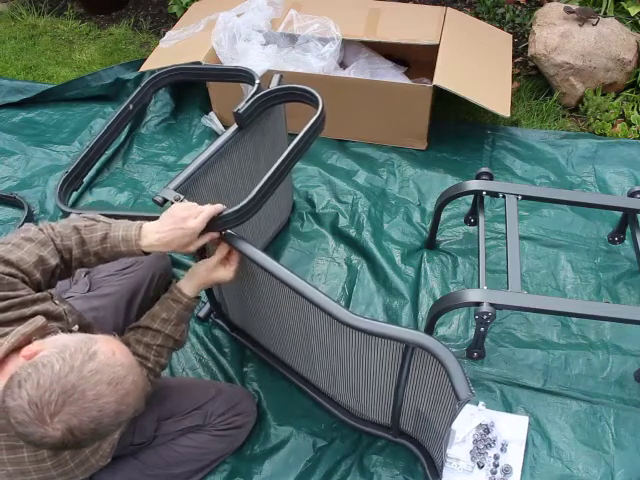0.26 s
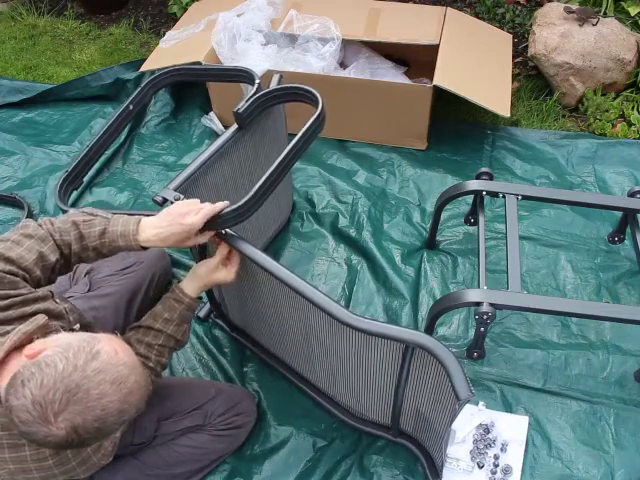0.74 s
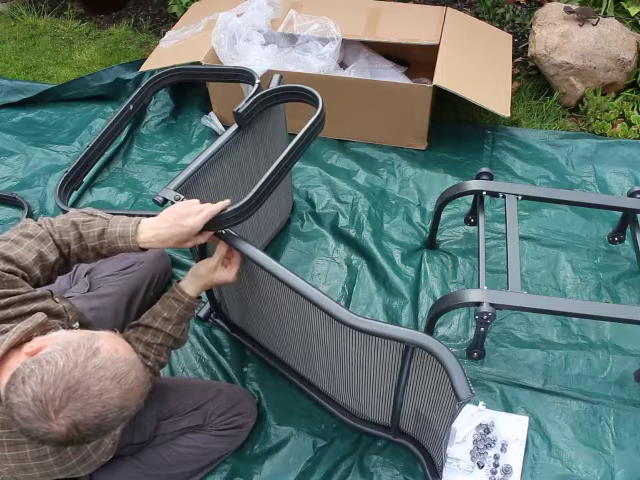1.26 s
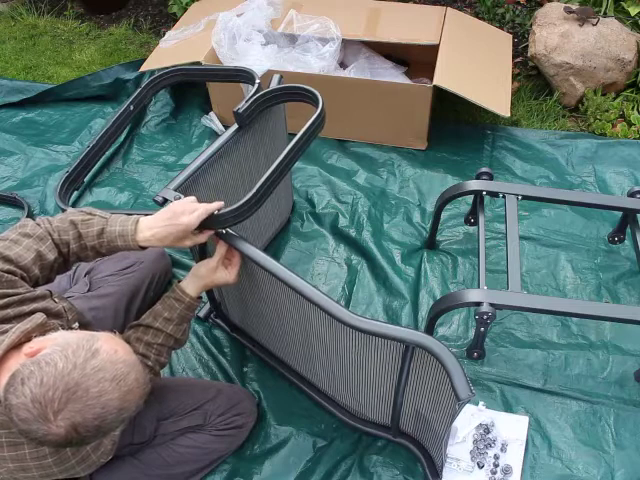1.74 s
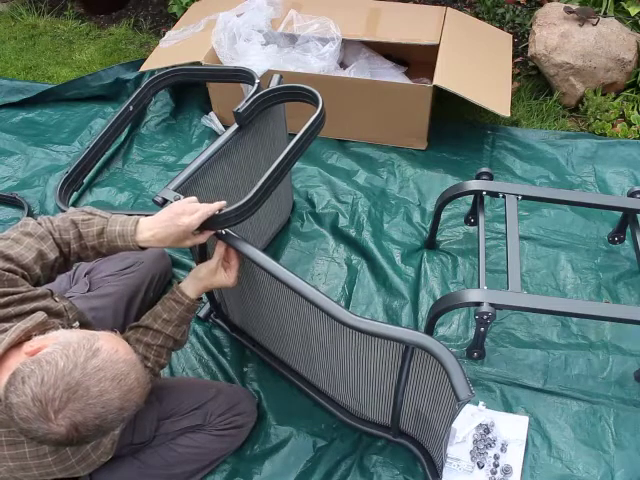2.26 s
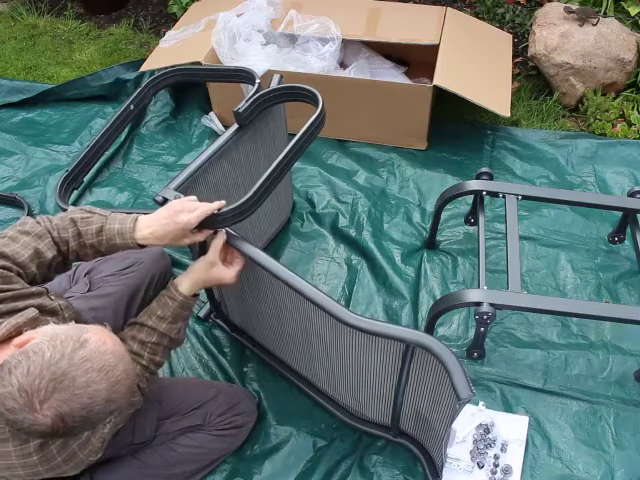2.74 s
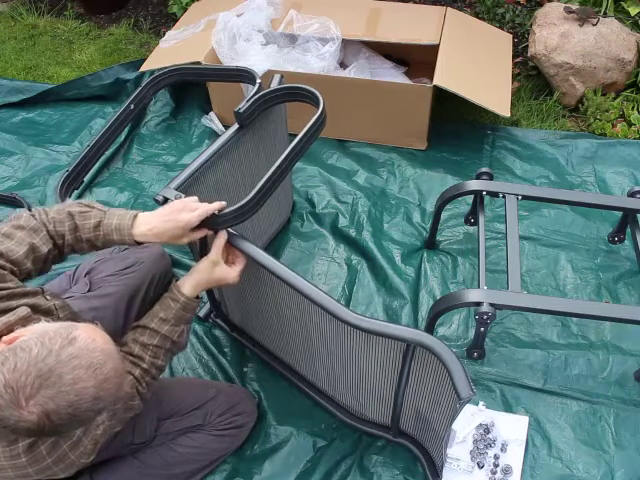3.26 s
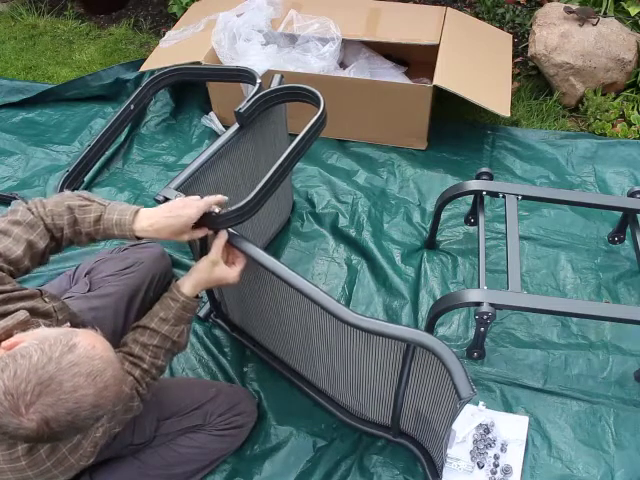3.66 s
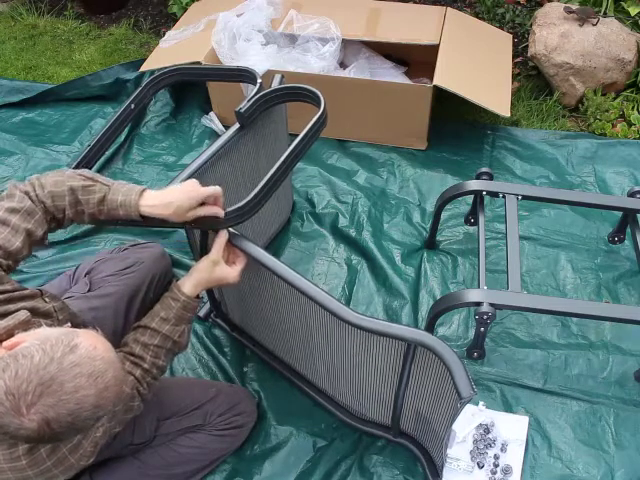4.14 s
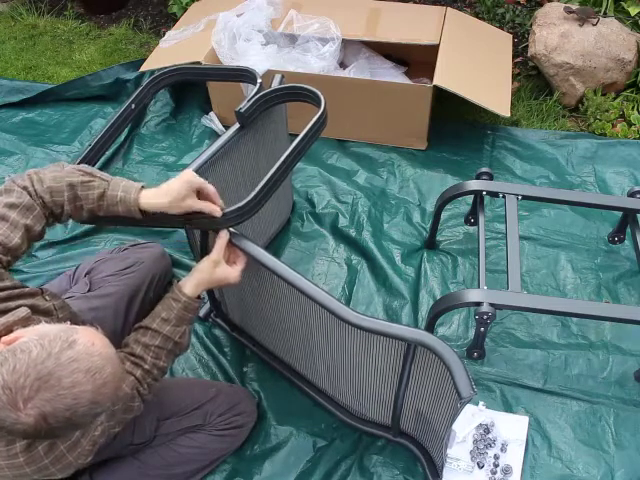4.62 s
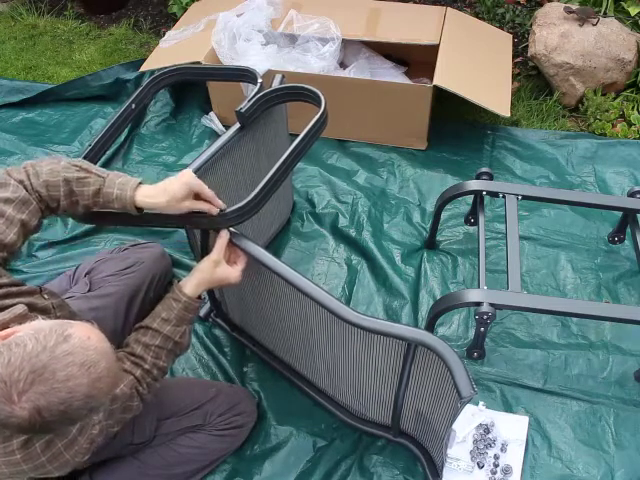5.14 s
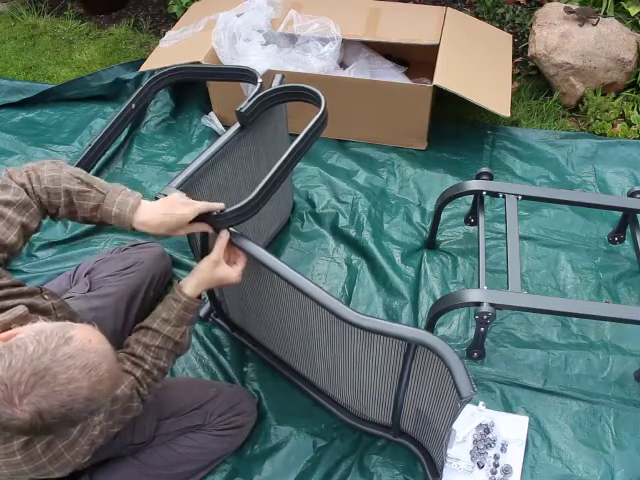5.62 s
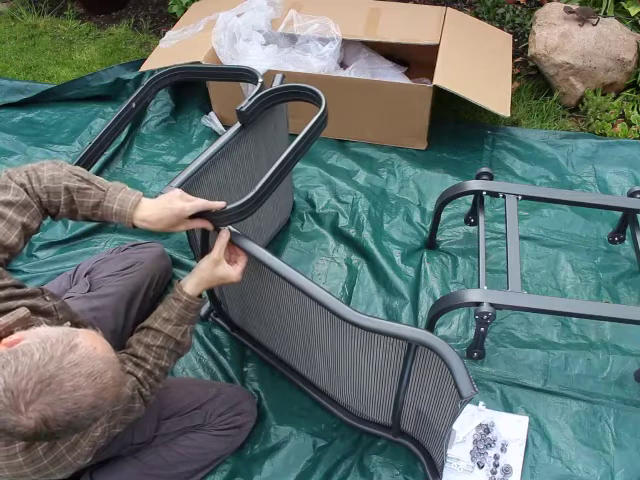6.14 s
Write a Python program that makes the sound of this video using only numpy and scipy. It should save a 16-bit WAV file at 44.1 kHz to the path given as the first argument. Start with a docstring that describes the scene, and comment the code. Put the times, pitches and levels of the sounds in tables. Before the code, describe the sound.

Small metal taps and clicks start first, close and crisp, with short scrapes from a thin-walled chair frame. A hoarse low growl leads into a pigeon's round hooting coos, seven notes with short gaps, rising and sagging in pitch. Behind them are faint bird whistles, clearest near the end, a distant second pigeon, light leaf rustle and soft air hiss. Open garden, close microphone, only slight short echoes.

```python
"""In a garden a wood pigeon coos close by, a second one answers far off and a songbird whistles.
Near the microphone, fingers turn a bolt in a tubular metal chair frame: taps, clicks and rubbing.
Voices are gliding sines mixed with band-limited noise; the chair is noise bursts exciting tube modes.
Leaves are grains of coloured noise, the air is shaped hiss, and far traffic is a drone and a roll."""
import sys
import numpy as np
from scipy import signal
from scipy.fft import rfft, irfft
from scipy.io import wavfile
from scipy.ndimage import uniform_filter1d

SR = 44100
rng = np.random.default_rng(int(sys.argv[2]) if len(sys.argv) > 2 else 0)


def pcm_store(signal):
    """Save signal as 16-bit PCM."""
    levels = np.round(np.clip(np.atleast_2d(signal), -1, 1) * 32767)
    wavfile.write(sys.argv[1], SR, levels.astype(np.int16).T)


N = 281799


def amp(db):
    """Level definition: decibels to an amplitude ratio."""
    return 10 ** (np.asarray(db) / 20)


def evened(x):
    """Normalisation: scales a signal to unit rms."""
    return x / np.sqrt(np.mean(x ** 2) + 1e-20)


def smooth(x, size):
    """Low-pass averaging: two passes of a moving mean over size samples."""
    return uniform_filter1d(uniform_filter1d(x, size), size)


def read(points, hz):
    """Interpolation of a spectrum curve on a logarithmic frequency axis."""
    f, value = np.transpose(points)
    return np.interp(np.log(hz + 1), np.log(f + 1), value)


def add(mix, s, sound):
    """Superposition: adds a sound into the mix from s seconds on."""
    part = mix[max(round(s * SR), 0):][:len(sound)]
    part += sound[:len(part)]


def follow(rows):
    """Linear interpolation: start time and the columns of a table at sample rate."""
    s, *columns = np.transpose(rows)
    t = np.arange(s[0], s[-1], 1 / SR)
    return s[0], [np.interp(t, s, c) for c in columns]


def resonate(x, hz, width):
    """Heterodyne resonator: shifts the curve hz down to zero, smooths, and shifts back."""
    turn = np.exp(2j * np.pi * np.cumsum(hz * np.ones(len(x))) / SR)
    r = np.exp(-np.pi * np.mean(width) / SR)
    return 2 * (turn * signal.lfilter([1 - r], [1, -r], x / turn)).real


def narrow_band(x, hz, width):
    """Cascaded resonance: two equal resonators in series give steeper skirts."""
    return resonate(resonate(x, hz, width), hz, width)


def coloured(x, gain):
    """Linear filtering: applies gain(hz) to the whole spectrum."""
    return irfft(rfft(x) * gain(np.fft.rfftfreq(len(x), 1 / SR)), len(x))


# Spectrum of the air hiss. Each row: frequency in Hz, relative density in dB per Hz.
AIR_SPECTRUM = [(15, -78), (25, -29), (252, -0.5), (496, 0), (568, -2), (651, -4), (952, -4), (1830, -17),
                (2040, -13.5), (2900, -66), (4990, -35), (6920, -23), (14800, -22), (16500, -35)]
AIR_DB = -42.5  # hiss rms
# Far traffic. Each row: time in seconds, drone level in dB, roll level in dB.
TRAFFIC_LEVELS = [(0.0, -54, -75), (0.36, -64, -62), (0.53, -73, -48), (0.76, -54, -68), (1.14, -60, -64),
                  (1.47, -74, -69), (1.69, -61, -69), (2.63, -79, -65), (2.69, -69, -59.5),
                  (3.92, -73, -59.5), (4.0, -62, -72), (4.29, -70, -62), (4.77, -66, -67),
                  (4.84, -75, -69.5), (6.07, -63, -57), (6.39, -80, -66)]


def air():
    """Broadband noise: hiss with drifting spectral patches, over a low tonal drone and a noisy roll."""
    frames, hz = N // 256 + 5, np.fft.rfftfreq(1024, 1 / SR)
    real, imaginary, patches = rng.standard_normal((frames, 513, 3)).T
    patches_db = evened(uniform_filter1d(uniform_filter1d(patches, 12, 0), 14, 1))
    spectrum = (real + 1j * imaginary) * amp(read(AIR_SPECTRUM, hz)[:, None] + patches_db)
    hiss = signal.istft(spectrum, nperseg=1024, noverlap=768)[1][:N]
    out = amp(AIR_DB) * evened(hiss)

    s, (drone_db, roll_db) = follow(TRAFFIC_LEVELS)
    noise = rng.standard_normal(len(drone_db))
    drone_hz = 70 + 1.5 * evened(smooth(noise, size=8000))
    drone = np.sqrt(2) * np.sin(2 * np.pi * np.cumsum(drone_hz) / SR)
    roll = evened(narrow_band(noise, 97, 45))
    add(out, s, amp(drone_db) * drone + amp(roll_db) * roll)
    return out


# Wind in the leaves. Each row: time in seconds, level in dB.
RUSTLE_LEVELS = [(0.0, -46), (1.17, -47), (1.26, -49.5), (2.12, -48), (2.47, -45), (3.35, -45.5),
                 (3.61, -43.5), (4.79, -45.5), (5.09, -45.5), (5.61, -45.5), (5.82, -46), (6.39, -44.5)]
# Spectrum of the leaves. Each row: frequency in Hz, relative density in dB per Hz.
LEAF_SPECTRUM = [(700, -18), (1500, 0.5), (2200, -0.5), (3200, -0.5), (4500, 0), (5800, -1.5), (6800, -8.5),
                 (9000, -12), (13000, -21)]


def rustle():
    """Granular friction noise: dense small grains of leaf contact that swell with the breeze."""
    s, (db,) = follow(RUSTLE_LEVELS)
    strength_db = 0.71 * np.minimum(rng.exponential(1, N // 100 + 1), 4)
    grains = rng.standard_normal(len(db)) * amp(strength_db).repeat(100)[:len(db)]
    out = np.zeros(N)
    add(out, s, amp(db) * evened(coloured(grains, lambda hz: amp(read(LEAF_SPECTRUM, hz)))))
    return out


RISE_SHARE, FALL_SHARE = .3, 2.5  # glide constants in call lengths: rises leap early, falls slide evenly
SWELL_SHARE, FADE_DB = .3, -4  # tapered share of a call (half at each end), level change over a call


def whistle(length, first_hz, last_hz, db, width, hoarse):
    """Tone and noise mixed by power: a gliding sine with a narrow noise band on the same pitch."""
    u = np.arange(0, length, 1 / SR) / length
    share = RISE_SHARE if last_hz > first_hz else FALL_SHARE
    hz = first_hz + (last_hz - first_hz) * (1 - np.exp(-u / share)) / (1 - np.exp(-1 / share))
    fuzz = evened(narrow_band(rng.standard_normal(len(u)), hz, width))
    pure = np.sqrt(2) * np.sin(2 * np.pi * np.cumsum(hz) / SR)
    shape = amp(db + FADE_DB * u) * signal.windows.tukey(len(u), SWELL_SHARE)
    return shape * (np.sqrt(1 - hoarse) * pure + np.sqrt(hoarse) * fuzz)


# Songbird notes. Each row: start in seconds, length in seconds, first pitch in Hz, last pitch in Hz,
# level in dB before swell and fade, noise spread in Hz.
SONG_NOTES = [(0, 0.045, 2110, 2060, -46.5, 100), (0, 0.087, 3550, 3350, -40, 500),
              (.68, 0.14, 2400, 2110, -43.5, 150), (.8, .14, 2230, 2180, -47, 250),
              (0.887, 0.19, 4400, 4470, -48, 600), (0.956, 0.17, 2500, 2600, -43, 300),
              (1.145, 0.047, 4150, 3750, -42, 250), (1.187, 0.1, 3680, 3560, -42, 250),
              (1.156, 0.21, 2100, 2250, -46.5, 200), (1.201, 0.093, 3300, 2800, -46.5, 400),
              (1.805, 0.097, 1760, 1780, -46, 80), (2.04, .13, 1995, 2020, -41, 90),
              (2.289, 0.25, 2770, 2400, -41.5, 320), (2.622, .19, 7300, 7400, -48, 500),
              (3.137, .13, 3150, 3165, -51.5, 40), (3.779, 0.079, 4300, 4450, -48, 199.6),
              (3.592, .07, 5470, 5390, -54, 79.63), (3.869, .07, 4240, 4710, -53, 200),
              (3.9, .11, 4860, 4900, -51, 120.5), (4.02, 0.077, 3400, 3600, -58, 250),
              (4.179, 0.091, 2250, 2040, -52, 35.2), (4.229, 0.042, 3500, 2550, -47, 39.93),
              (4.643, 0.13, 2250, 2900, -47, 40), (4.65, 0.046, 2060, 2190, -41, 60),
              (4.73, 0.088, 1800, 2240, -37.5, 60), (4.845, 0.061, 3150, 2440, -38, 39.92),
              (5.103, 0.097, 1690, 1675, -39, 50), (5.251, 0.062, 1730, 2100, -33, 250),
              (5.343, 0.067, 2285, 2270, -27.5, 60), (5.413, 0.14, 2230, 2179, -29, 40),
              (5.53, 0.094, 2190, 2151, -41, 60)]
# Coos of the far pigeon. Each row: start in seconds, length in seconds, first pitch in Hz,
# last pitch in Hz, level in dB before swell and fade.
FAR_COO_NOTES = [(1.5, 0.11, 512, 516, -34), (2.1, 0.214, 440, 505, -39.5), (3.03, .17, 458, 462, -38.5),
                 (3.7, 0.22, 516.6, 504.6, -45), (5.19, 0.13, 500.5, 483, -41), (5.95, 0.13, 500, 499, -37),
                 (6.11, 0.32, 440, 548, -43.5)]
HOARSE_AT_HZ = 90  # spread at which a songbird's whistle is half noise by power


def far_birds():
    """Frequency-modulated whistling: distant song and coos; the wider a song note, the hoarser."""
    out = np.zeros(N)
    for s, *call in FAR_COO_NOTES:
        add(out, s, whistle(*call, width=32, hoarse=0.17))
    for s, *call in SONG_NOTES:
        spread_hz = call[-1]
        add(out, s, whistle(*call, hoarse=1 / (1 + (HOARSE_AT_HZ / spread_hz) ** 2)))
    return out


# Modes of the tubular frame. Each row: frequency in Hz, bandwidth in Hz, gain in dB.
TUBE_MODES = [(867, 25, -5), (1172, 6.2, -4.5), (1236, 25, 6), (1480, 47, 7.5), (1690, 15, 2),
              (1952, 22.4, 8.5), (2157, 61, 5.5), (2363, 59, 1.5), (2666, 57, -1.5), (2840, 21, -15.5),
              (3110, 43, -0.5), (3370, 25, 4), (3570, 16, -5), (3700, 110, -5), (4000, 30, -7.5),
              (4560, 25, -20.5), (4624, 25, -7), (4953, 75, 3.5), (5430, 17, -9.5), (5870, 49, -5.5),
              (5750, 45, -12), (6200, 53, -4), (7400, 50, -10), (8130, 88, -0.5)]


def frame(force, weights_db):
    """Modal superposition: the tube modes ring under a force."""
    out = 0
    for (f, width, db), weight_db in zip(TUBE_MODES, weights_db):
        out = out + amp(db + weight_db) * resonate(force, f, width) / np.sqrt(width)
    return out


def thin_walls(hz):
    """Radiation efficiency: thin tube walls radiate little bass and little top treble."""
    return 1 / (1 + (600 / (hz + 1)) ** 4) / (1 + (hz / 12000) ** 6)


# Short slides of bolt and fingers. Each row: start in seconds, length in seconds, level in dB,
# colour centre in Hz, breadth in octaves (6 dB down), ring share from 0 to 1.
SLIDES = [(0.201, 0.15, -51.5, 4900, 1.3, 0.65), (0.411, 0.1, -49.5, 3350, 3.6, 0.8),
          (0.552, 0.13, -44, 2560, 0.97, 0.7), (1.477, 0.33, -40, 2720, 1.2, 0.96),
          (2.573, 0.18, -43.5, 4000, 0.53, 1), (3.114, 0.089, -67, 9970, 0.42, 0.2),
          (3.414, 0.13, -47.5, 4300, 0.41, 0.9), (3.862, 0.24, -51, 3770, 0.65, 0.28),
          (4.459, 0.14, -50.5, 2840, 1.7, 0.72), (4.937, 0.1, -49, 2910, 1.26, 1),
          (5.309, 0.077, -45, 2678, 1.08, 0.99), (5.706, .2, -43, 2596, 0.92, 0.6),
          (5.941, 0.13, -52.5, 3500, 0.68, 0.49)]


def scrapes():
    """Stick-slip friction as clumped grains: they swell quickly and die away, partly ringing the tubes."""
    out = np.zeros(N)
    for s, length, db, colour_hz, breadth, ring in SLIDES:
        u = np.arange(16384) / SR / length
        clumps = amp(5.4 * np.minimum(rng.exponential(1, 128), 3)).repeat(128)
        swell = np.sin(np.pi * np.minimum(u, 1) ** 0.38)
        grains = rng.standard_normal(len(u)) * clumps * swell

        def colour(hz):
            octaves = np.log2((hz + 1) / colour_hz)
            return amp(np.maximum(-6 * (octaves / breadth) ** 2, -60))

        grains = coloured(grains, colour)
        rung = frame(grains, np.zeros(len(TUBE_MODES)))
        slide = (1 - ring) * evened(grains) + ring * evened(rung)
        # the root refers the level to the slide's length, not to the whole buffer
        add(out, s, amp(db) * evened(coloured(slide, thin_walls)) * np.sqrt(u[-1]))
    return out


# Taps of bolt and fingers. Each row: time in seconds, nominal peak in dB (three times the early rms),
# ringing region in Hz, hardness in dB per octave, chatter t60 in seconds, ring share from 0 to 1.
TAP_EVENTS = [(0.208, -31, 1490, -9, 0.1, 0.5), (0.2305, -29, 3350, -4, 0.099, 0.3),
              (0.4245, -22.5, 1480, 14, 0.098, 0.75), (0.4435, -21, 1940, 5, 0.079, 0.55),
              (0.5586, -28, 1970, -5, 0.065, 0.7), (0.5723, -18, 1940, -6, 0.071, 0.46),
              (0.623, -8, 1940, 5.5, 0.096, 0.33), (0.6614, -16.5, 5050, -4, 0.034, 0.62),
              (1.0049, -8.5, 3770, 1.5, 0.047, 0.54), (1.5105, -13.5, 3400, 1, 0.089, 0.73),
              (1.5496, -8, 1966, 0, 0.17, 0.62), (1.5994, -14.5, 1963, 1.5, 0.2, 0.5),
              (1.6324, -16.5, 1950, 4, 0.16, 0.65), (1.6716, -10.5, 5070, 4, 0.081, 0.58),
              (1.7076, -17, 1973, -12, 0.087, 0.63), (1.722, -12, 1980, -6, 0.071, 0.75),
              (2.173, -5.5, 1952, -0.5, 0.057, 0.61), (2.513, -15.5, 4720, 9, 0.062, 0.51),
              (2.5275, -28.5, 1940, -10, 0.08, 0.63), (2.574, -2.5, 5100, 5, 0.06, 0.49),
              (2.6263, -21, 1458, -5, 0.063, 0.55), (2.6875, -23, 1946, -15, 0.069, 0.58),
              (2.9185, -18.5, 1920, 2, 0.065, 0.58), (3.1072, -21.5, 1237, -6, 0.11, 0.42),
              (3.1437, -24.5, 2000, 13, 0.08, 0.72), (3.4079, -3.5, 1950, 4.5, 0.057, 0.4),
              (3.5244, -26, 1314, 0, 0.068, 0.6), (3.535, -18.5, 1955, -8, 0.072, 0.66),
              (3.6461, -12.5, 2400, 7, 0.065, 0.82), (3.6647, -16.5, 2405, -1, 0.065, 0.58),
              (3.8551, -11.5, 1220, 0, 0.057, 0.74), (3.8651, -23.5, 1970, 5, 0.062, 0.89),
              (3.9889, -15.5, 1240, -2, 0.071, 0.6), (4.2666, -8, 3420, 2, 0.06, 0.52),
              (4.3713, -26.5, 1220, 1.5, 0.054, 0.63), (4.4401, -18.5, 1200, -7, 0.065, 0.58),
              (4.4572, -8, 3080, 1, 0.065, 0.41), (4.4877, -12, 3110, -1, 0.065, 0.4),
              (4.7067, -20.5, 1207, -6.5, 0.062, 0.57), (4.8381, -19.5, 3410, -9, 0.052, 0.7),
              (4.9158, -25, 2650, -12, 0.073, 0.62), (4.9413, -12.5, 3126, -1, 0.065, 0.73),
              (4.9593, -6.5, 3120, 1, 0.058, 0.65), (4.9785, -6.5, 3110, 2, 0.069, 0.54),
              (5.0502, -26, 1710, -6, 0.065, 0.56), (5.0636, -14, 1470, -5, 0.067, 0.67),
              (5.0789, -26, 3420, 1.5, 0.061, 0.6), (5.229, -6.5, 3430, -3.5, 0.057, 0.82),
              (5.3142, -9, 2410, 0.5, 0.063, 0.63), (5.3291, -11.5, 3363, -1.5, 0.056, 0.66),
              (5.3435, -13.5, 2260, -3, 0.057, 0.74), (5.6146, -23.5, 2063, -3, 0.069, 0.6),
              (5.672, -23, 1480, -11, 0.076, 0.6), (5.7269, -27.5, 2280, 13, 0.065, 0.58),
              (5.7437, -11, 2192, -1, 0.079, 0.59), (5.7567, -3, 2405, 1, 0.055, 0.51),
              (5.9314, -1.5, 3360, 1, 0.072, 0.51), (6.027, -13, 2690, -3.5, 0.065, 0.58)]
# Spectrum of the contact force. Each row: frequency in Hz, gain in dB.
CONTACT_SPECTRUM = [(300, -58.5), (650, 0.5), (900, 0), (1500, 1.5), (3000, 4.5), (5000, 0.5), (7000, -9),
                    (8500, -20.5), (10500, -11.5), (12500, -19), (16000, -63)]
BREADTH_OCTAVES = 1.24  # distance from the ringing region at which modes are 6 dB weaker
NEAREST_MODE_DB = 5  # boost of the mode nearest to the region


def taps():
    """Impact excitation: a tick and brief chatter, partly heard directly, partly ringing the tubes."""
    out, t, modes_hz = np.zeros(N), np.arange(8192) / SR, np.transpose(TUBE_MODES)[0]
    lead = 64  # samples of room before the onset, for the filters
    for s, db, region_hz, hardness_db, t60, ring in TAP_EVENTS:
        bounces = amp(1.2 * rng.standard_normal(128)).repeat(64)  # the parts chatter unevenly
        chatter = bounces * amp(-60 * t / t60)
        tick = amp(-60 * t / 0.00063)
        onset = 1 - np.exp(-t / 0.00048)
        force = np.roll(rng.standard_normal(len(t)) * (chatter + tick) * onset, lead)
        force = coloured(force, lambda hz: amp(read(CONTACT_SPECTRUM, hz)))

        direct = coloured(force, lambda hz: (hz / 3000 + .1) ** (hardness_db / 6))
        treble = coloured(direct, lambda hz: 1 / (1 + (7000 / (hz + 1)) ** 4))
        direct = direct - treble * (1 - amp(-60 * t / 0.051))  # the treble dies first

        octaves = np.log2(modes_hz / region_hz)
        place_db = 3.5 * rng.standard_normal(len(TUBE_MODES))  # each spot of the tube favours other modes
        place_db = place_db + NEAREST_MODE_DB * (abs(octaves) == abs(octaves).min())
        region_db = np.maximum(-6 * (octaves / BREADTH_OCTAVES) ** 2, -25)
        rung = frame(force, place_db + region_db)

        tap = coloured((1 - ring) * evened(direct) + ring * evened(rung), thin_walls)
        early_peak = np.sqrt((tap[:400] ** 2).mean() * 9)
        add(out, s - lead / SR, amp(db) * tap / early_peak)
    return out


# Resonances of the inflated throat. Each row: frequency in Hz, width in Hz, gain in dB.
CROP_RESONANCES = [(395.5, 62, 14), (440, 71, 14), (595, 390, -8)]


def crop(noise):
    """Cavity resonance: air noise through the inflated throat, which shuts out all above it."""
    rung = sum(amp(db) * narrow_band(noise, f, width) for f, width, db in CROP_RESONANCES)
    return evened(coloured(rung, lambda hz: 1 / (1 + (hz / 680) ** 8) / (1 + (320 / (hz + 1)) ** 10)))


# The hoarse first note. Each row: time in seconds, level in dB, pitch in Hz.
GROWL_NOTE = [(.28, -48.5, 202), (.45, -36.5, 230), (.6, -35.5, 260), (.7, -28, 302), (.74, -33, 295),
              (.77, -75, 285)]
# Coos of the near pigeon, one table a note. Each row: time in seconds, pitch in Hz, tone level in dB.
COO_NOTES = [
    [(0.94, 246.6, -70), (0.96, 263.3, -39), (0.982, 281, -37), (1.038, 289, -30.5), (1.052, 324.4, -42),
     (1.064, 355.3, -22), (1.104, 404.6, -14), (1.15, 448.8, -14.5), (1.154, 452, -32.5), (1.158, 453, -16),
     (1.172, 458, -9.5), (1.25, 461.7, -25), (1.274, 462.6, -9.5), (1.428, 469.4, -7.5), (1.448, 470, -25),
     (1.502, 458.6, -25.5), (1.52, 454.7, -43)],
    [(1.6, 229.7, -53), (1.616, 324, -27), (1.632, 413, -26.5), (1.662, 470.7, -11), (1.716, 463.2, -31),
     (1.73, 461.6, -15), (1.784, 452.3, -6), (1.798, 436.7, -12.5), (1.84, 385.3, -18.5),
     (1.856, 364.7, -36), (1.872, 352.6, -16), (1.908, 335.4, -33), (1.95, 285, -31.5), (1.998, 286.3, -32),
     (2.054, 283.6, -28), (2.088, 275.5, -34), (2.116, 244.6, -37.5), (2.17, 214.0, -61)],
    [(2.355, 229.5, -48), (2.371, 308.3, -29.5), (2.385, 371, -31), (2.405, 424.3, -12),
     (2.421, 464.2, -11.5), (2.477, 393, -12), (2.503, 379.6, -23.5), (2.541, 384.5, -15),
     (2.641, 434, -40.5), (2.671, 407.0, -10.5), (2.709, 358.8, -23), (2.715, 362.7, -39),
     (2.741, 385.5, -13), (2.843, 383.5, -24.5), (2.865, 358.9, -12.5), (2.933, 316.2, -38.5),
     (2.969, 282.8, -29.5), (3.02, 233.6, -50)],
    [(3.35, 374.4, -63), (3.372, 392.3, -24), (3.394, 423.3, -11.5), (3.428, 500, -20.5), (3.436, 509, -24),
     (3.446, 508.6, -16), (3.488, 513.5, -13.5), (3.592, 519.4, -13), (3.6, 506, -12), (3.63, 441, -11),
     (3.636, 428.3, -38), (3.654, 423.6, -18.5), (3.678, 415, -32), (3.688, 414.2, -32),
     (3.706, 407.5, -50), (3.72, 403, -45)],
    [(3.885, 255.6, -59), (3.897, 297.3, -28), (3.913, 358.9, -29.5), (3.933, 427.4, -16),
     (3.951, 489, -12), (3.965, 492, -23), (3.973, 488.0, -11), (4.147, 489.3, -14), (4.187, 484.3, -21.5),
     (4.253, 484, -13.5), (4.293, 479.3, -26), (4.321, 476.7, -15.5), (4.339, 475.3, -16.5),
     (4.357, 460.3, -23), (4.379, 447.5, -6), (4.387, 435, -24.5), (4.443, 411.9, -25.5),
     (4.47, 399.8, -46)],
    [(4.555, 230.2, -37), (4.569, 318, -35), (4.581, 397.2, -16), (4.611, 475.7, -11.5),
     (4.629, 473.6, -23), (4.637, 477, -17.5), (4.671, 475.9, -23), (4.711, 464.0, -10), (4.737, 455.4, -9),
     (4.765, 428.6, -23.5), (4.801, 391.2, -10), (4.823, 374, -28), (4.845, 357, -19), (4.857, 338.9, -29),
     (4.891, 276.9, -43), (4.927, 278.4, -32), (5.045, 228.4, -44), (5.08, 224.4, -78)],
    [(5.325, 232.2, -52), (5.343, 315.8, -28), (5.361, 399, -23), (5.377, 430.7, -9), (5.393, 461.6, -14),
     (5.469, 404.5, -14), (5.623, 436.5, -37.5), (5.647, 414.4, -6), (5.697, 377.8, -26),
     (5.719, 390, -9.5), (5.733, 409.5, -23.5), (5.749, 426.2, -12.5), (5.767, 426.3, -35),
     (5.803, 413, -13.5), (5.851, 365.0, -23.5), (5.919, 360, -15), (5.971, 293.5, -55),
     (6.02, 268.2, -30.5)],
]
# Low notes let the octave out. Each row: pitch in Hz, mean octave level in dB.
OCTAVE_LEVELS = [(230, -37), (290, -41.5), (350, -54.5), (430, -60), (500, -47)]
OVERTONE_FLICKER_DB = 4  # rms
# the rasp follows the mean effort of the tone, unevenly: offset, dB per dB of effort, rms flicker
RASP_DB, RASP_PER_DB, RASP_FLICKER_DB = -19, 0.594, 3.5
# under LOW_HZ the voice turns hoarse: extra rasp in dB, and extra waver (rms share of pitch, like WAVER)
LOW_HZ, LOW_RASP_DB, WAVER, LOW_WAVER = 330, 5, .008, .03


def pigeon():
    """Phase-continuous phonation: an almost pure tone from the closed beak over a rasp of air."""
    t = np.arange(N) / SR
    times, *curves = np.concatenate(COO_NOTES).T
    hz, tone_db = (np.interp(t, times, c) for c in curves)
    sounding = sum((t >= note[0][0]) & (t < note[-1][0]) for note in COO_NOTES) > 0
    effort_db = 20 * np.log10(smooth(amp(tone_db), size=2500))
    low = 1 / (1 + (hz / LOW_HZ) ** 12)  # near 1 below LOW_HZ, near 0 above

    overtone_flicker = evened(smooth(rng.standard_normal(N), size=1500))
    overtone_db = read(OCTAVE_LEVELS, hz) + OVERTONE_FLICKER_DB * overtone_flicker
    rasp_flicker = evened(smooth(rng.standard_normal(N), size=900))
    rasp_db = RASP_DB + RASP_PER_DB * effort_db + RASP_FLICKER_DB * rasp_flicker + LOW_RASP_DB * low
    tone, overtone, rasp = (smooth(amp(db) * sounding, size=300) for db in (tone_db, overtone_db, rasp_db))

    waver = evened(smooth(rng.standard_normal(N), size=300))
    wavering_hz = smooth(hz, size=300) * (1 + (WAVER + LOW_WAVER * low) * waver)
    phase = 2 * np.pi * np.cumsum(wavering_hz) / SR
    voice = np.sqrt(2) * (tone * np.sin(phase) + overtone * np.sin(2 * phase))
    out = voice + rasp * crop(rng.standard_normal(N))

    s, (growl_db, growl_hz) = follow(GROWL_NOTE)
    breath = rng.standard_normal(len(growl_hz))
    rough = evened(narrow_band(breath, growl_hz, 81))
    add(out, s, amp(growl_db) * evened(0.84 * rough + crop(breath)))
    return out


def garden(x, t60, first):
    """Decaying reflections: sparse echoes of random sign from walls and fences, after first seconds."""
    echoes = np.zeros(SR)
    at = np.arange(0, SR - 40, 40) + rng.integers(0, 40, (SR - 1) // 40)
    echoes[at] = rng.choice([-1., 1.], len(at))
    t = np.arange(SR) / SR
    echoes *= amp(-60 * t / t60) * (t > first)
    return signal.oaconvolve(x, echoes / np.linalg.norm(echoes))[:N]


def scene():
    """Superposition of direct and reflected sound: birds and chair with echoes, leaves and air without."""
    coos, birds, chair = pigeon(), far_birds(), taps() + scrapes()
    coos = coos + amp(-14) * garden(coos, t60=.25, first=.012)
    birds = birds + amp(-3) * garden(birds, t60=.3, first=.015)
    chair = chair + amp(-11) * garden(chair, t60=.22, first=.003)
    return (coos + birds + chair + rustle() + air())[None]


def record(dry):
    """Dynamic compression: gain eases down at the loudest moments; peaks round off; then the band limit."""
    power_db = 10 * np.log10(abs(uniform_filter1d(dry[0] ** 2, 4000)) + 1e-12)
    over_db = uniform_filter1d(np.maximum(power_db + 13.0, 0), 3000)
    eased = dry / amp(.4 * over_db)
    rounded = eased / (1 + abs(eased / .97) ** 6) ** (1 / 6)
    low_pass = signal.firwin(1023, 15900, window=("kaiser", 9), fs=SR)  # edge in Hz
    return signal.oaconvolve(rounded, low_pass[None], "same")


dry = scene()
out = record(dry)
pcm_store(out)
```